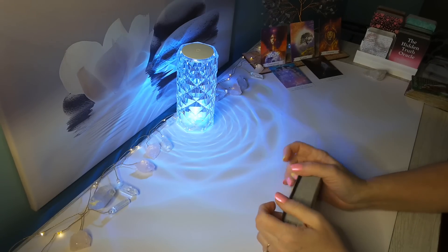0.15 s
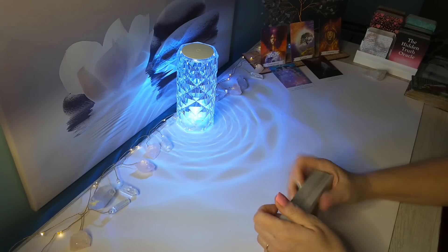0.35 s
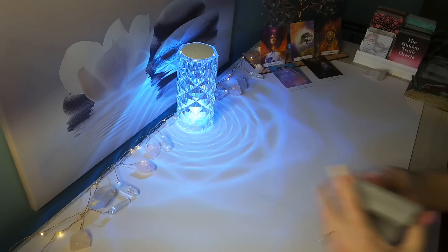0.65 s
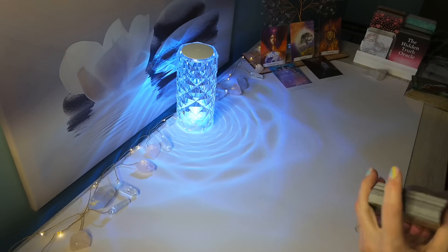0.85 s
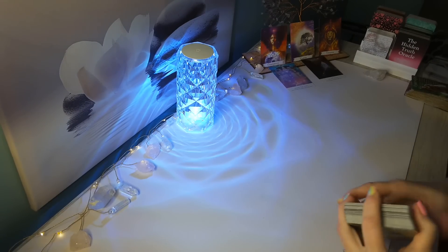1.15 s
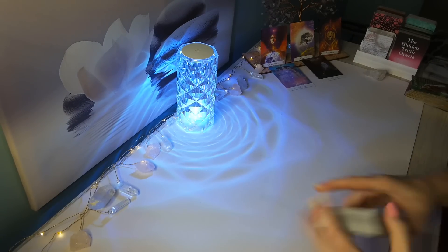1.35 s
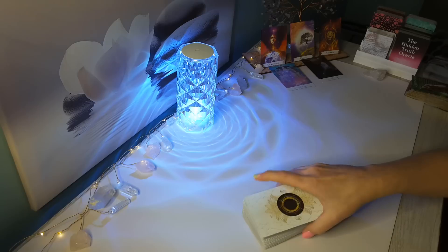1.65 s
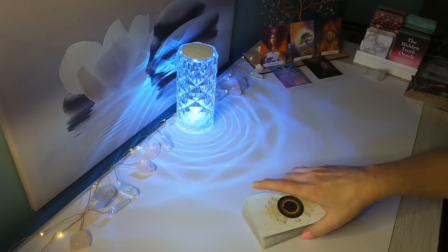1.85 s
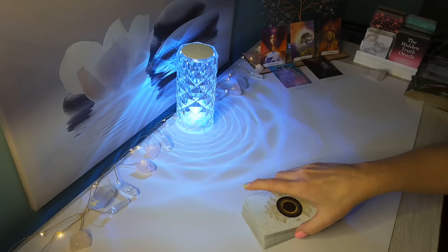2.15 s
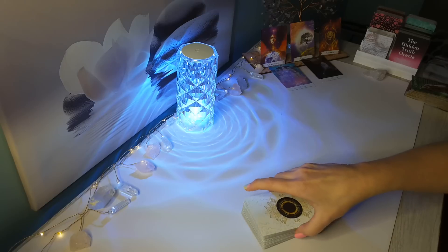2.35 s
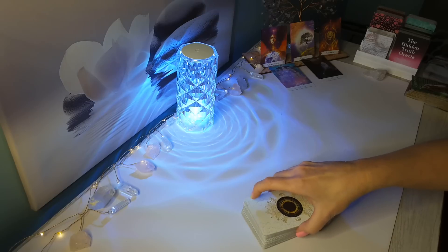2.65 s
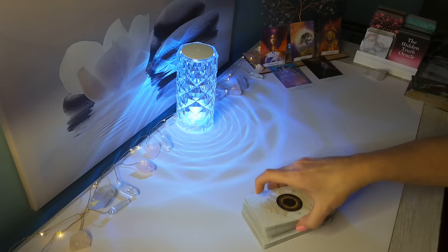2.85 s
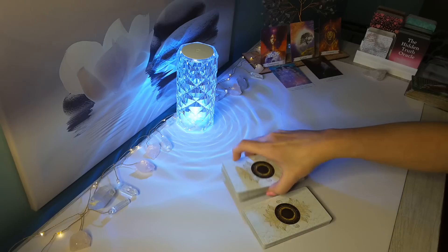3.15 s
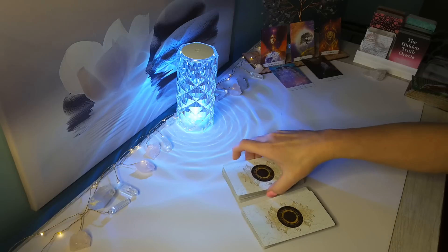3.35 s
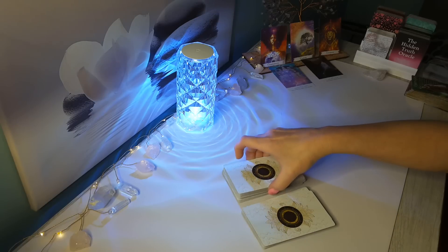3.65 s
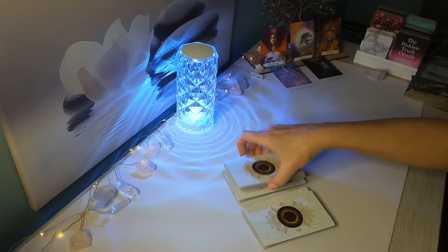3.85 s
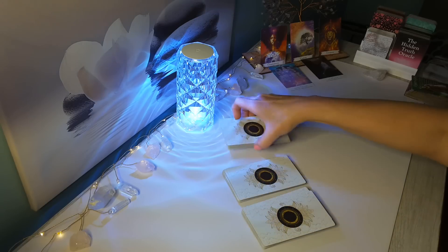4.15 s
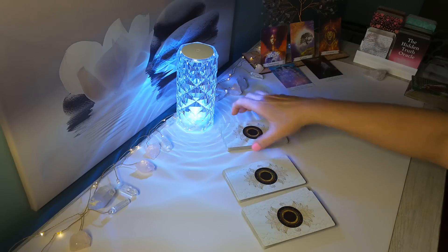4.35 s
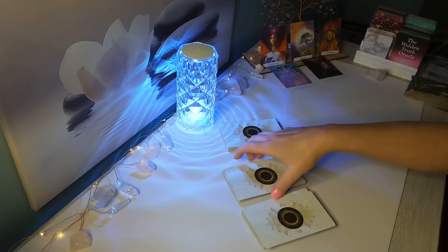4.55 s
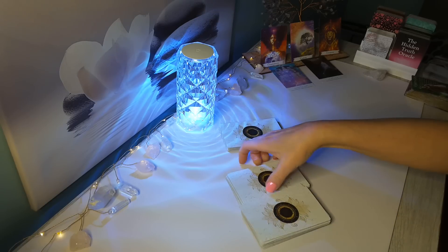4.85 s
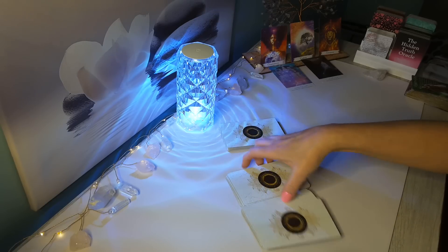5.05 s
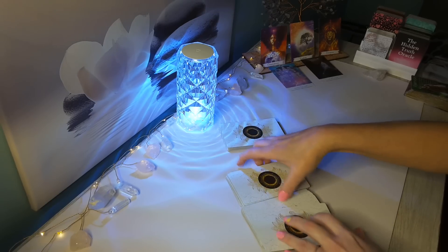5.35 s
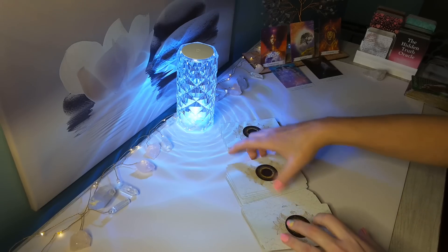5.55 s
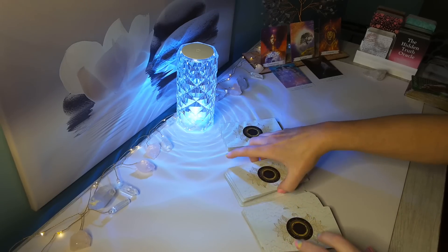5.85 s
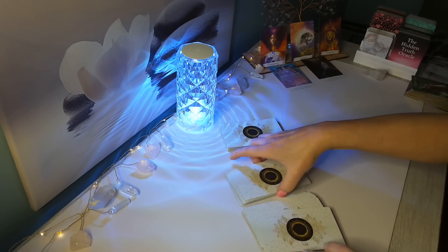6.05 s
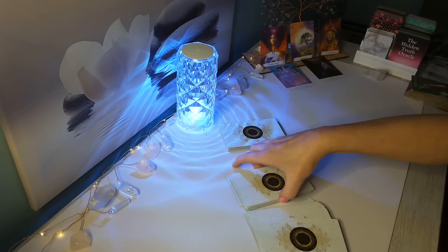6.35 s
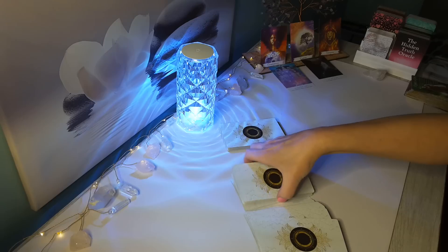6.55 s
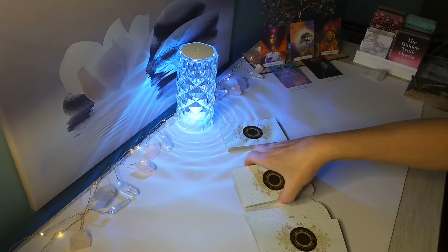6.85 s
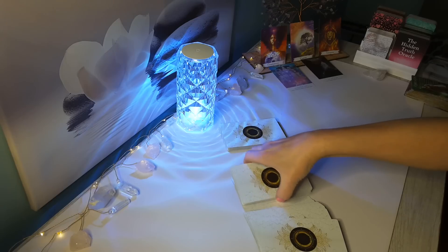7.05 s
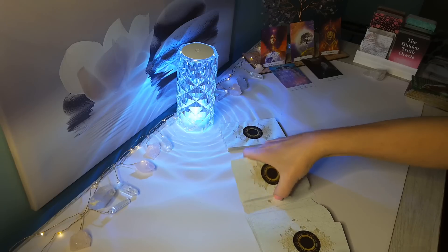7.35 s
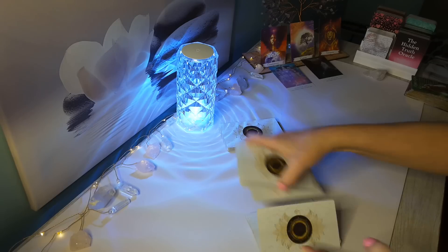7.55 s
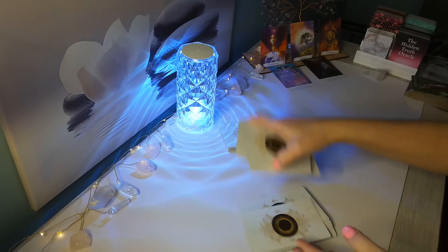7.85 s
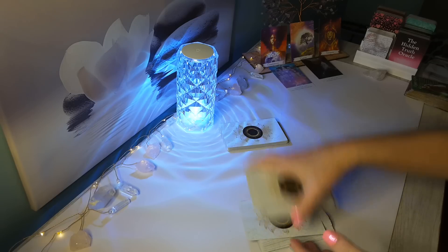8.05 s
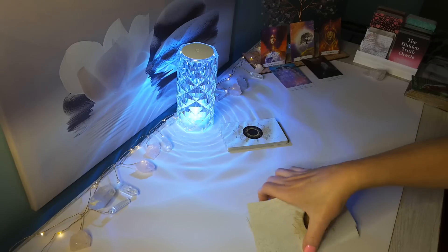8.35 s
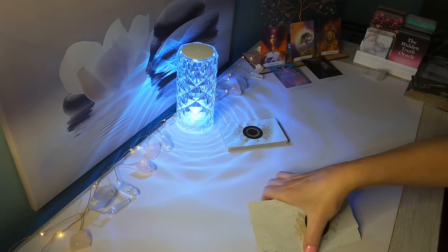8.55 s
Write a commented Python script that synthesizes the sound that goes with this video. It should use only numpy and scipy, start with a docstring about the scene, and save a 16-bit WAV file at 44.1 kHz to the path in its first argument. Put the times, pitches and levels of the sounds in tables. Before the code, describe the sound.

Stiff cards in a small furnished room, heard close and clear. First a gritty slide and crisp slap, then one strong woody knock as the deck lands. Near silence follows, then softer thumps of piles being cut, light scrapes and clicks, and finally a dense cluster of papery rustles and snaps as the piles are stacked again. Short room reflections and soft hiss lie beneath.

```python
"""Cards on a wooden table

A deck of stiff cards is squared, set down, cut into piles and gathered again in a small room.
Card faces slide and rub as grains of noise; edges snap with a click and a short crackle.
Piles and knuckles push the table top and its damped modes ring; a few faint sines swell and fade.
Dense echoes, one lingering room mode and room tone surround them; two microphone ports share
one bright resonance.
"""
import sys
import numpy as np
from scipy import signal
from scipy.fft import rfft, irfft, next_fast_len
from scipy.io import wavfile

SR = 44100
rng = np.random.default_rng(int(sys.argv[2]) if len(sys.argv) > 2 else 0)


def transcribe(signal):
    """Save signal, clipped to [-1, 1], as a 16-bit WAV file at the path in sys.argv[1]."""
    frames = np.atleast_2d(signal).T
    limited = np.clip(frames, -1, 1)
    pcm = np.round(limited * 32767).astype(np.int16)
    wavfile.write(sys.argv[1], SR, pcm)


N = 383421


def from_db(db):
    """Amplitude ratio of a level in dB."""
    return 10 ** (np.asarray(db) / 20)


def rms_one(x):
    """Scales to rms 1."""
    return x / np.sqrt(np.mean(x ** 2) + 1e-20)


def at_hz(points, hz):
    """Interpolates (Hz, value) points over log frequency."""
    points_hz, values = np.array(points).T
    return np.interp(np.log(np.maximum(hz, 1)), np.log(points_hz), values)


def band(x, low_hz, high_hz, order=2):
    """Butterworth band-pass."""
    edges_hz = [low_hz, min(high_hz, .45 * SR)]
    return signal.sosfilt(signal.butter(order, edges_hz, "band", fs=SR, output="sos"), x)


def by_frequency(x, gain):
    """Scales the spectrum by gain(Hz)."""
    size = next_fast_len(N)
    hz = np.arange(size // 2 + 1) * SR / size
    return irfft(rfft(x, size) * gain(hz), size)[:N]


def add(track, start_s, piece):
    """Mixes a piece into a track, cut at the track's end."""
    at = round(start_s * SR)
    track[at:at + len(piece)] += piece[:N - at]


def ring(push, hz, t60_s):
    """Two-pole resonator: a unit click sets a decaying sine of initial height 1 ringing."""
    radius, angle = from_db(-60 / (t60_s * SR)), 2 * np.pi * hz / SR
    poles = [1, -2 * radius * np.cos(angle), radius * radius]
    return signal.lfilter([0, np.sin(angle)], poles, push + 1e-18)  # offset avoids denormals


def table(push, ring_share=0.55):
    """The top rings in its modes; cards and hands damp them to ring_share of their free decay."""
    # Each row: frequency in Hz, relative level in dB, free t60 in s.
    table_modes = [(157.6, -9.5, 0.3), (239.4, -2.5, 0.29), (319.4, 2.5, 0.16), (460, -3.5, 0.17),
                   (587.2, -10, 0.23), (777, -8, 0.054), (780, -20.5, 0.47), (870, -29, 0.35),
                   (950, -15.5, 0.12), (1189, -25, 0.078)]
    out = 0
    for k, (hz, level_db, t60_s) in enumerate(table_modes):
        out = out + from_db(level_db) * (-1) ** k * ring(push, hz, ring_share * t60_s)
    return out


def with_papery(bright_db, dull_db):
    """Levels of bright, papery, dull; papery sits below bright by a share of how far dull lies under it."""
    papery_share, heaviest_db = 0.46, -3.5  # dull counts as at least 3.5 dB under bright
    papery_db = bright_db + papery_share * min(dull_db - bright_db, heaviest_db)
    return [bright_db, papery_db, dull_db]


def card_bands(layers, trims_db):
    """Bright, papery and dull parts of a card sound, each from its own excitation."""
    bright, papery, dull = from_db(trims_db)[:, None] * layers
    return band(bright, 4450, 15000, order=1), band(papery, 1550, 4250), band(dull, 475, 1484)


def grains(per_s, spread_db):
    """Random clicks of uneven size mixed with almost as much smooth noise; rms 1."""
    sizes_db = spread_db * np.minimum(rng.exponential(1, N), 5)
    sizes = from_db(sizes_db) * rng.choice([-1, 1], N)
    clicks = sizes * (rng.random(N) < per_s / SR)
    return rms_one(rms_one(clicks) + .9 * rng.standard_normal(N))


def clumps(per_s, depth_db):
    """A rub catches and slips, so its level lurches."""
    knots = rng.standard_normal(round(N / SR * per_s) + 2)
    level = np.interp(np.arange(N) * per_s / SR, np.arange(len(knots)), knots)
    return from_db(depth_db * level)


def pressure():
    """Gains of hiss, rasp, rustle and rumble: every stroke climbs and sinks evenly in dB."""
    # Card faces sliding. Each row: full pressure in s, rise in s, fall in s, then relative levels
    # in dB of hiss, rustle of the pile, rumble in the table.
    sliding = [(0.032, 0.58, 0.067, -15.5, -31, -37), (0.15, .05, 0.19, -41, -45, -46),
               (0.085, 0.03, 0.086, -34, -24.5, -40), (0.46, 0.22, 0.16, -63.5, -71, -75),
               (0.538, 0.36, 0.075, -69, -53.5, -46), (1.078, 0.072, 0.063, -55.5, -61, -61),
               (1.454, .12, 0.095, -53.5, -72, -68), (1.72, 0.14, 0.14, -51, -59.5, -56.5),
               (1.971, 0.14, 0.43, -62.5, -73, -72), (3.386, 0.071, 0.13, -53, -58.5, -66),
               (4.26, 0.32, 0.063, -80, -85, -62), (4.76, 0.23, 0.045, -60, -59.5, -51),
               (4.904, 0.083, 0.07, -54.5, -61, -52.5), (5.151, 0.45, 0.29, -66.5, -74, -62.5),
               (5.907, .07, 0.099, -58.5, -64.5, -49.5), (6.126, 0.17, 0.15, -62, -56.5, -57),
               (6.368, 0.2, 0.097, -60.5, -62.5, -44.5), (6.72, 0.68, 0.79, -60, -70.5, -54.5),
               (7.37, 0.14, 0.81, -54, -70.5, -64.5), (7.51, 0.12, 0.15, -52, -55, -62.5),
               (7.63, .1, 0.45, -69, -76, -50.5), (7.755, 0.084, 0.11, -38.5, -42, -48),
               (8.098, 0.14, 0.078, -63, -70, -63), (8.31, 0.12, 0.34, -54, -58, -42.5),
               (8.69, 0.15, 0.094, -57, -72, -52)]
    # Loose cards settling after a pile lands. Each row: full pressure in s, fall in s, then relative
    # levels in dB of hiss, rustle, rumble.
    settling = [(0.338, 1, -53, -74, -80), (0.838, 0.089, -32, -55, -51), (3.295, .12, -63, -63, -56.5),
                (4.301, 0.13, -56, -70, -43), (4.405, 0.1, -62.5, -71, -45.5),
                (4.629, 0.3, -57, -56, -43.5), (5.42, 0.24, -66, -73, -58),
                (5.5, 0.16, -49.5, -52.5, -38.5), (5.69, 0.21, -57, -70, -52),
                (6.048, 0.021, -52, -58, -46), (6.579, 0.13, -53.5, -51, -39.5),
                (6.862, 0.35, -71, -53, -46), (7.916, 0.061, -46.5, -68, -52.5),
                (8.195, 0.21, -42, -48, -46.5), (8.52, 0.2, -56.5, -51.5, -51)]
    settle_rise_s = 0.0069
    swing_db = 30  # gained over the rise, lost over the fall
    strokes = list(sliding) + [(s, settle_rise_s, *rest) for s, *rest in settling]

    gains, t = np.zeros((4, N)), np.arange(N) / SR
    for full_s, rise_s, fall_s, hiss_db, rustle_db, rumble_db in strokes:
        first = max(round((full_s - 2 * rise_s) * SR), 0)
        near = slice(first, round((full_s + 2 * fall_s) * SR))
        away = np.maximum((full_s - t[near]) / rise_s, (t[near] - full_s) / fall_s)
        levels_db = [*with_papery(hiss_db, rustle_db), rumble_db]
        gains[:, near] += np.outer(from_db(levels_db), from_db(-swing_db * away))
    return gains


def slides(rumble_trim_db=-8):
    """Rubbing fibres give dense grains, coarser in the lower parts; the pile knocks softly on the table."""
    rubbing = np.array([grains(per_s=3000, spread_db=3),
                        grains(per_s=1200, spread_db=3.5),
                        grains(per_s=600, spread_db=3.5)])
    knocks = band(grains(per_s=290, spread_db=2.5), 140, 900)
    rumble = rms_one(table(knocks, ring_share=0.054)) * from_db(rumble_trim_db)
    layers = [*card_bands(rubbing, trims_db=[-14, -1.5, 5]), rumble]
    return clumps(per_s=60, depth_db=3) * np.sum(layers * pressure(), axis=0)


def brushes(rise_s=0.0021):
    """A short gritty rub of a card face bites at once, holds for about its length and lets go."""
    # Each row: start in s, relative bright level in dB, relative dull level in dB,
    # length in ms (Gaussian fall to 1/e).
    rubs = [(0.0716, -29.5, -36.5, 35), (0.1284, -20, -23, 10), (0.3338, -47, -75, 32),
            (0.6892, -42.5, -65, 39), (0.7783, -47.5, -59.5, 130), (1.052, -52, -53.5, 15),
            (1.0796, -49, -50, 7.7), (1.4412, -50, -61, 9.9), (3.381, -48.5, -44.5, 12),
            (4.7286, -40, -52, 13.4), (5.8881, -55, -69, 20), (6.556, -51, -51.5, 38),
            (6.6586, -33.5, -70, 8.8), (6.94, -53, -54, 6), (7.03, -41.5, -66, 9.8), (7.088, -56, -55, 4.9),
            (7.221, -54, -60, 6), (7.5924, -40, -54, 25), (8.5227, -67, -51, 8.8)]
    size = 3000  # samples; longer rubs are cut here
    layers, t = np.zeros((3, N)), np.arange(size) / SR
    shape = (len(rubs), 3, size)
    grit = rng.standard_normal(shape) * rng.exponential(1, shape)
    for (start_s, *ends_db, length_ms), bursts in zip(rubs, grit):
        stroke = np.minimum(t / rise_s, 1) * np.exp(-(t * 1000 / length_ms) ** 2)
        for layer, level_db, burst in zip(layers, with_papery(*ends_db), bursts):
            add(layer, start_s, from_db(level_db) * burst * stroke)
    return sum(card_bands(layers, trims_db=[-22, -3.5, 4]))


def thuds(push_trim_db=-8):
    """Piles and knuckles push the table top softly and let go; a longer contact sounds duller."""
    # Each row: start in s, relative level in dB, contact in ms (five times the push's time constant).
    landings = [(0.078, -28, 1.2), (0.519, -54, 1.1), (0.829, -42.5, 1.6), (1.664, -49, 1.8),
                (1.817, -45, 2.8), (1.994, -10, 1.6), (3.281, -33, 4.7), (3.382, -28, 0.61),
                (3.392, -41, 0.83), (4.284, -32, 3), (4.3, -47, 1.9), (4.402, -28.5, 3.2),
                (4.418, -55, 1.8), (4.61, -22.5, 3.1), (4.629, -34.5, 2.2), (5.406, -52.5, 1.7),
                (5.485, -31.5, 1.6), (5.895, -26.5, 5.9), (6.045, -38.5, 3), (6.112, -26, 3.4),
                (6.129, -40, 2.8), (6.344, -50.5, 1.6), (6.571, -45, 1.5), (6.849, -40, 0.84),
                (6.941, -54, 2.6), (7.023, -43, 3.8), (7.063, -43, 1.5), (7.599, -37.5, 1.9),
                (7.727, -38, 1), (8.07, -47.5, 1.2), (8.186, -27.5, 2.3), (8.275, -35, 1.6),
                (8.518, -42, 2.4), (8.61, -58, 1.7)]
    push, t = np.zeros(N), np.arange(800) / SR
    for start_s, level_db, contact_ms in landings:
        shape = t * np.exp(-t * 5000 / contact_ms)
        add(push, start_s, from_db(level_db + push_trim_db) * shape / shape.sum())
    return table(push)


def snaps(click_size=1.3, crackle=.9):
    """A card edge snaps with a click and crackles on briefly; the duller the part, the longer it lasts."""
    # Each row: start in s, relative level in dB of the bright edge, of the dull slap of the card face.
    edge_snaps = [(0.2014, -41, -53), (0.4455, -46, -59), (0.6472, -38.5, -56), (0.7023, -39, -47.5),
                  (0.827, -19.5, -26.5), (0.8343, -21, -31), (1.3727, -40.5, -78), (1.702, -47, -63),
                  (1.822, -53.5, -65), (1.9963, -33, -30), (3.2847, -37, -66), (3.2917, -54, -60),
                  (4.2868, -43, -59), (4.3018, -37.5, -48), (4.405, -42.5, -62), (4.6164, -35, -46.5),
                  (4.7583, -46.5, -48), (4.7685, -43, -53), (4.8955, -60, -68), (5.0344, -49, -68.5),
                  (5.412, -46, -55), (5.4202, -48, -61), (5.4893, -28.5, -33.5), (5.4988, -28.5, -31),
                  (5.6852, -31.5, -90), (5.975, -53, -70), (6.0486, -31.5, -68), (6.114, -52, -60),
                  (6.3712, -52, -54), (6.5302, -53, -65), (6.5818, -32, -43.5), (6.666, -37.5, -41.5),
                  (6.7145, -45, -57), (6.7506, -36, -55.5), (6.8535, -36.5, -38.5), (7.352, -53, -63),
                  (7.4804, -41.5, -45), (7.515, -51, -45.5), (7.5408, -42.5, -45), (7.6054, -56, -64),
                  (7.6576, -34, -41.5), (7.691, -42, -47), (7.7252, -40, -39), (7.7423, -34, -43),
                  (7.7538, -35, -36), (7.7616, -29.5, -35.5), (7.91, -46, -54), (7.921, -33.5, -45),
                  (8.0643, -52, -54.5), (8.1902, -33, -42), (8.212, -50, -57), (8.2758, -35, -40.5),
                  (8.375, -43, -51.5), (8.622, -39, -54)]
    size = 1200
    layers, t = np.zeros((3, N)), np.arange(size) / SR
    fades = np.exp(-t / np.array([[.0017], [.0022], [.005]]))  # time constants in s
    noise = rng.standard_normal((len(edge_snaps), 3, size))
    for (start_s, *ends_db), bursts in zip(edge_snaps, noise):
        for layer, level_db, burst, fade in zip(layers, with_papery(*ends_db), bursts, fades):
            add(layer, start_s, from_db(level_db) * (crackle * burst * fade + click_size * (t == 0)))
    return sum(card_bands(layers, trims_db=[-9, 2, 8]))


def tones():
    """Faint sines; each swells quickly and fades more slowly."""
    # Each row: start in s, length in s, frequency in Hz, rms level at the top of the swell in dB.
    swelling_sines = [(2.204, 0.18, 458, -64), (5.607, 0.33, 460, -70.5), (5.974, 0.32, 614, -68.5),
                      (6.228, 0.11, 576, -71), (6.26, 0.19, 802, -73)]
    rise_share = 0.28
    out = np.zeros(N)
    for start_s, length_s, hz, level_db in swelling_sines:
        t = np.arange(round(length_s * SR)) / SR
        swell = np.sin(np.pi / 2 * np.interp(t / length_s, [0, rise_share, 1], [0, 1, 0]))
        add(out, start_s, np.sqrt(2) * from_db(level_db) * swell * np.sin(2 * np.pi * hz * t))
    return out


def room_tone(level_db=-71.5):
    """Steady noise shaped to the spectrum of the room's air."""
    # Each row: frequency in Hz, relative spectral density in dB.
    air_spectrum = [(60, 7.5), (150, -0.5), (400, -4), (1000, -10), (2500, -14.5), (6000, -30.5),
                    (12000, -31.5)]
    white = rng.standard_normal(N)
    return from_db(level_db) * rms_one(by_frequency(white, lambda hz: from_db(at_hz(air_spectrum, hz))))


def echoes(x, first_echo_s=0.0048):
    """Dense echoes as octaves of noise, each dying at its own rate; unit-energy response."""
    # Each row: frequency in Hz, t60 in s.
    room_decay = [(100, 0.22), (260, 0.28), (700, 0.29), (1840, 0.37), (4850, 0.21), (12800, 0.11)]
    t = np.arange(SR // 2) / SR
    white = rng.standard_normal((2, len(t)))
    tail = np.zeros(len(t))
    for k, low_hz in enumerate(60 * 2 ** np.arange(9)):
        t60_s = at_hz(room_decay, np.sqrt(2) * low_hz)
        tail += band(white[k % 2], low_hz, 2 * low_hz) * from_db(-60 * t / t60_s)
    tail = tail * (t > first_echo_s)
    return signal.fftconvolve(x, tail / np.sqrt(np.sum(tail ** 2)))[:N]


def scene():
    """Cards, echoes, one ringing mode, sines and room tone in the middle; very faint echoes at the sides."""
    room_db, room_side_db = -7, -41
    mode_hz, mode_db, mode_t60_s = 458, -52.5, 0.4
    paper = snaps() + brushes() + slides()
    cards = paper + thuds()
    standing_wave = from_db(mode_db) * ring(paper, mode_hz, mode_t60_s)
    mid = cards + from_db(room_db) * echoes(cards) + standing_wave + tones() + room_tone()
    side = from_db(room_side_db) * echoes(cards)  # a second, independent set
    return np.array([mid + side, mid - side])


def port(x):
    """The cavity behind the port is a resonant low-pass; the housing shades the band below it."""
    dip_hz, dip_width_hz, dip_share = 6300, 3230, 0.4
    port_hz, port_width_hz = 8250, 1064
    x = x - dip_share * signal.lfilter(*signal.iirpeak(dip_hz, dip_hz / dip_width_hz, fs=SR), x)
    radius = np.exp(-np.pi * port_width_hz / SR)
    poles = [1, -2 * radius * np.cos(2 * np.pi * port_hz / SR), radius * radius]
    return signal.lfilter([sum(poles)], poles, x)  # unit gain at 0 Hz


def record(dry):
    """Thin bass, a port resonance that favours the left, hiss and drift of the electronics, a cut top."""
    # How far the left port outweighs the right. Each row: frequency in Hz, side over mid as a ratio.
    left_lean = [(1500, 0.01), (2200, 0.15), (4400, 0.21), (6300, 0.53), (7800, 0.73), (9200, 0.29),
                 (10500, .04), (12000, 0.099), (14000, -0.018)]
    bass_cut_hz, top_cut_hz = 117, 16250
    hiss_db, hiss_side_db, drift_db, offset = -74, -7, -85.5, -.0004

    bass_cut = signal.butter(4, bass_cut_hz, "high", fs=SR, output="sos")
    left, right = port(signal.sosfilt(bass_cut, dry))
    mid = (left + right) / 2
    side = (left - right) / 2 + by_frequency(mid, lambda hz: at_hz(left_lean, hz))

    drift = from_db(drift_db) * rms_one(band(rng.standard_normal((2, N)), 8, 82))
    noise = from_db(hiss_db) * rng.standard_normal((2, N)) + drift
    mid = mid + noise[0] + offset
    side = side + from_db(hiss_side_db) * noise[1]

    top_cut = signal.cheby2(16, 50, top_cut_hz, fs=SR, output="sos")  # 50 dB down from top_cut_hz
    return signal.sosfilt(top_cut, [mid + side, mid - side])


dry = scene()
out = record(dry)
transcribe(out)
```